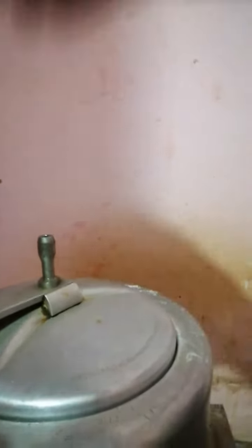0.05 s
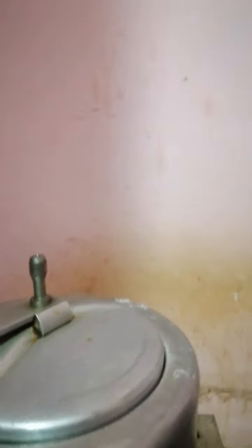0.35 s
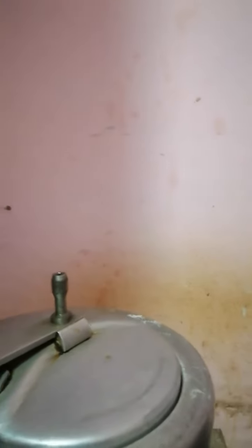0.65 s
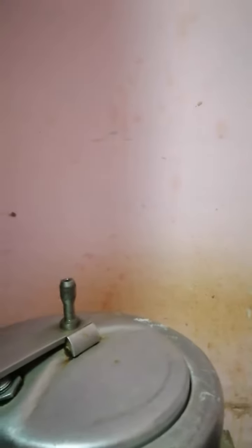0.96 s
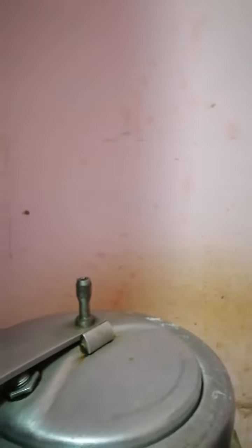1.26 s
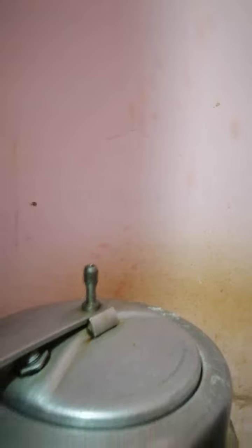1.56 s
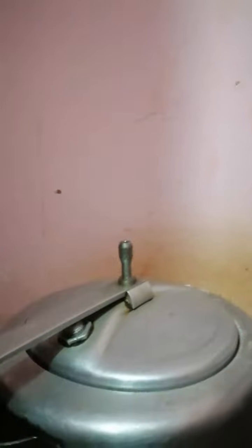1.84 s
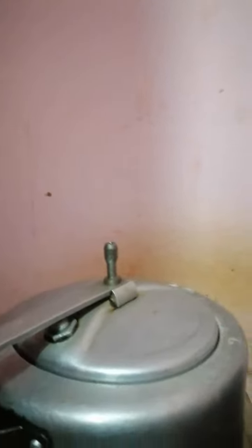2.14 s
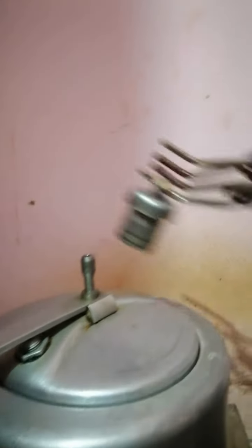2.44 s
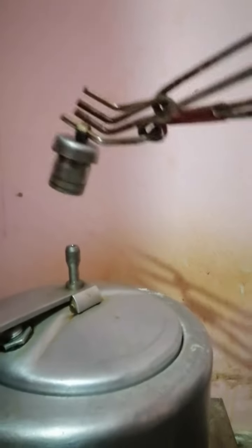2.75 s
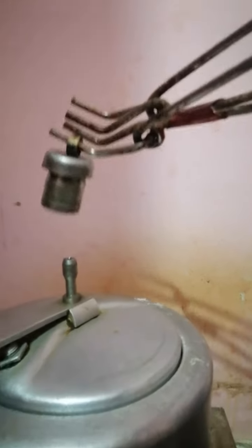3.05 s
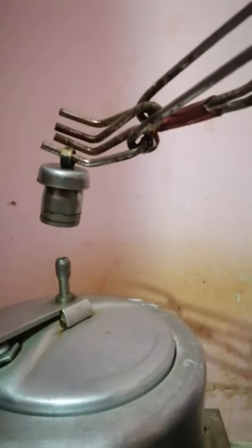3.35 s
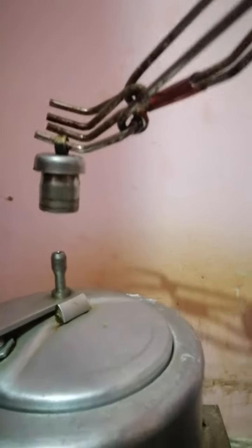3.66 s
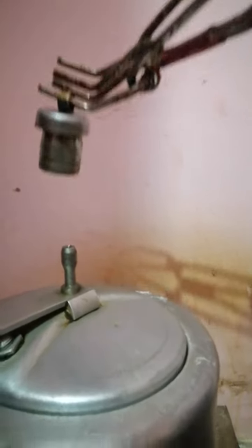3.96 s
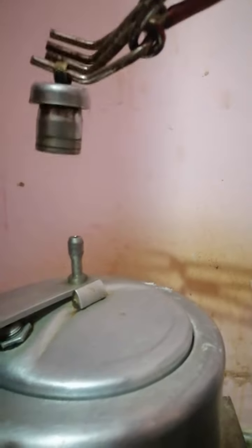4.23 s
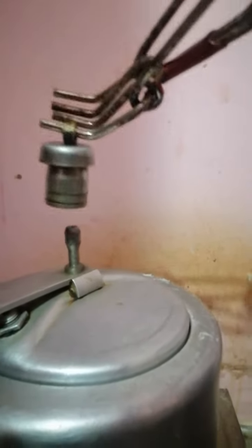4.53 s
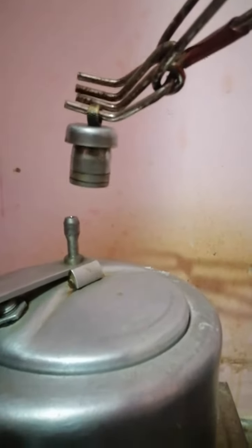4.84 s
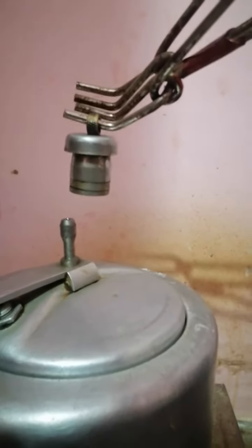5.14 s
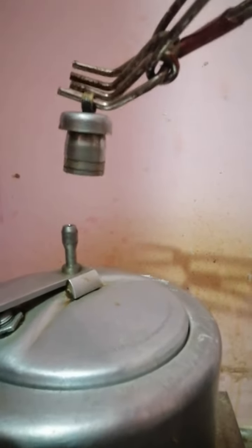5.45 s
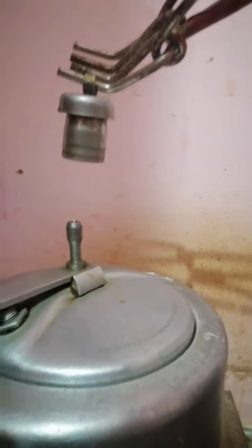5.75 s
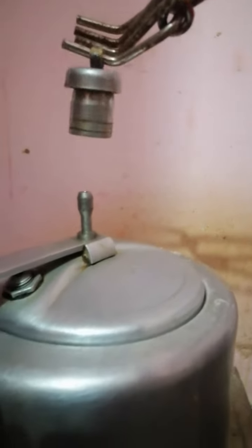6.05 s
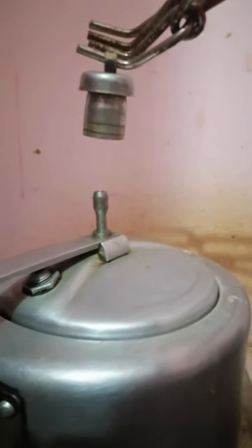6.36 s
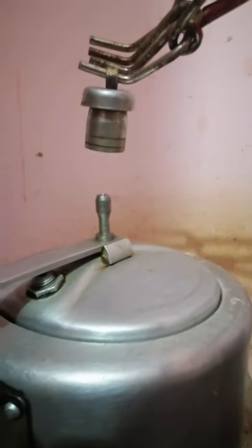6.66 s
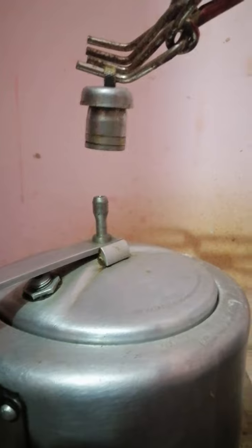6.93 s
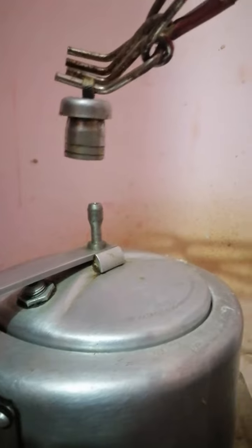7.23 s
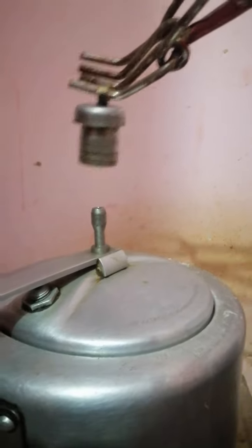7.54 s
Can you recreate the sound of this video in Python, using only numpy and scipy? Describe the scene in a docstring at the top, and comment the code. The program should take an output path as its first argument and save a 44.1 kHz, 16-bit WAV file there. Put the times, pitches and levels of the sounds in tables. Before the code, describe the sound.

A pressure cooker's even steam hiss breaks into uneven surges and thin whistles as a metal weight sways above the vent.

```python
"""An even, bright hiss: steam jets from the vent pipe of a pressure cooker, close by in a small kitchen.
A hand leaves the jet at the start with a low puff; drops of condensate tick at the pipe's lip.
From about 2.6 s the valve weight, held in tongs, sways in the steam. Grazing its rim, the jet hisses
sharply; striking it squarely, it rushes and roars, and the cavities under and inside the weight ring.
Thin whistles come and go at the edges, and the gas flame rumbles underneath."""
import sys
import numpy as np
from scipy import signal
from scipy.fft import rfft, irfft, next_fast_len
from scipy.io import wavfile
from scipy.ndimage import map_coordinates

SR = 44100
rng = np.random.default_rng(int(sys.argv[2]) if len(sys.argv) > 2 else 0)


def unload_audio(sound):
    """Save the sound as a 16-bit wav file, at the path given as the first command line argument."""
    columns = np.transpose(np.atleast_2d(sound))
    # keep every value between -1 and 1, then stretch to whole-number steps
    steps = np.round(np.clip(columns, -1, 1) * 32767)
    wavfile.write(sys.argv[1], SR, steps.astype(np.int16))


N = 334865


# Free jet: time_s, level_db
JET_LEVEL = [(0, -30.5), (0.11, -33), (0.16, -34), (2.5, -35), (2.68, -35.5), (2.95, -40), (3.15, -36),
             (3.55, -32.5), (3.75, -34), (3.92, -41), (4.5, -36.5), (4.68, -33.5), (4.88, -34), (5.02, -41),
             (5.27, -33), (5.8, -39), (6.6, -36), (7.25, -36), (7.59, -41.5)]
# Its spectrum: freq_hz, density_db
JET_COLOUR = [(60, -57), (300, -20), (780, -12), (1350, -8), (1600, -0.5), (2100, -5.5), (3000, -3),
              (4100, -2.5), (5600, 2), (6300, -3), (7700, 1.5), (8300, -1.5), (9500, 0.5), (10700, 0),
              (12000, -6.5), (15000, -12)]
# Its left-right balance: freq_hz, lean_db
JET_LEAN = [(800, -2), (1050, 1.5), (1600, -7), (2100, 2.5), (3400, -2.5), (4200, -2), (5800, -1.5),
            (9400, -2), (11000, 4.5), (14000, -0.5)]
def jet():
    """The turbulent free jet gives an even, bright hiss."""
    level_db, = curves(JET_LEVEL)
    hiss = turbulence(JET_COLOUR, flutter_db=0.5, eddy_db=0)
    hiss = unit(filtered(hiss, lambda hz: placed(1, along(JET_LEAN, hz))))
    return placed(amp(level_db) * hiss, lean_db=2.6 * during(CATCH, fade_s=0.039))


# Steam caught by the weight: time_s, level_db, aim_db (left positive)
CATCH = [(2.53, -55, -15), (2.61, -30.5, -2), (2.95, -34.5, -2), (3.42, -35, -2), (3.85, -34.5, 0),
         (4.2, -36.5, 0.5), (4.62, -32, 0), (5.05, -34, -1), (5.7, -34.5, 0), (6.3, -33.5, 0.5),
         (6.9, -37.5, -0.5), (7.35, -38, 2.5), (7.59, -32.5, 1.5)]
# Weight swings clear: start_s, end_s, loss_db
SLIPS = [(3.533, 3.727, 7.5), (4.244, 4.548, 13), (4.718, 4.819, 27), (4.958, 5.124, 3), (5.323, 5.47, 7)]
def caught_steam():
    """Level and aim of the steam meeting the weight; the level drops as the weight swings clear."""
    level_db, aim_db = curves(CATCH)
    loss_db = sum(db * gate(start, end, attack_s=0.02, release_s=0.024) for start, end, db in SLIPS)
    return level_db - loss_db, aim_db


# Square hits on weight or tongs: start_s, end_s, roar_db, hollow_db
STRIKES = [(2.66, 2.813, -51, -37.5), (2.844, 3.1, -47, -39.5), (3.098, 3.492, -39, -36.5),
           (3.822, 4.135, -47, -45), (4.124, 4.583, -41, -49), (4.598, 4.68, -46.5, -59),
           (4.835, 4.895, -45.5, -61.5), (5.194, 5.342, -48, -54.5), (5.463, 5.57, -43.5, -60),
           (5.727, 5.87, -42, -43), (5.985, 6.124, -39.5, -50), (6.275, 6.404, -43, -52),
           (6.596, 6.647, -41.5, -52)]
def strike_gains():
    """Each square hit drives the roar and the hollow ring."""
    return sum(np.outer(amp([roar_db, hollow_db]), gate(start, end, attack_s=0.016, release_s=0.02))
               for start, end, roar_db, hollow_db in STRIKES)


# Jet grazes the rim: start_s, end_s, hiss_db
GRAZES = [(2.614, 2.697, -26), (2.7, 2.891, -24.5), (2.924, 3.099, -26), (3.537, 3.649, -25),
          (3.705, 3.882, -26), (3.887, 4.12, -33), (4.726, 4.803, -28), (4.838, 4.914, -32),
          (5.19, 5.295, -33.5), (5.338, 5.431, -25.5), (5.581, 5.718, -33), (5.881, 5.977, -34),
          (6.16, 6.249, -27), (6.442, 6.575, -25), (6.661, 6.884, -25.5), (6.966, 7.135, -25),
          (7.181, 7.478, -26.5), (7.507, 7.623, -26)]
FULL_GRAZE_DB = -26.5
def graze_gain():
    """Each graze drives the rim hiss."""
    return sum(amp(db) * gate(start, end, attack_s=0.0267, release_s=0.03965)
               for start, end, db in GRAZES)


# Big-eddy spectrum: freq_hz, density_db
ROAR_COLOUR = [(60, -11), (160, -11), (260, -6), (480, 4.5), (900, 3.5), (1600, 1), (2400, 1), (4000, -24),
               (9000, -11.5)]
# Small-eddy spectrum: freq_hz, density_db
RUSH_COLOUR = [(60, -50), (250, -35), (600, -8), (1200, -0.5), (1700, 1.5), (4500, 1), (6000, 1), (7600, 3),
               (8700, 1), (9600, -0.5), (11000, -14), (14000, -25)]
FULL_STRIKE_DB, STRIKE_RUSH_DB, GRAZE_DUCK_DB, IDLE_ROAR_DB = -28.5, 14, 1, -20
def deflected_steam(caught_db, aim_db, strike, graze):
    """The jet breaks up on the weight: big eddies roar, small ones rush."""
    squareness = strike / amp(FULL_STRIKE_DB)
    thrown_db = aim_db - 3 * squareness  # strikes throw the steam to the right
    roar_gain = np.hypot(strike, amp(caught_db + IDLE_ROAR_DB))
    roar = roar_gain * turbulence(ROAR_COLOUR, flutter_db=-0.1, eddy_db=-0.5)
    rush_db = caught_db + 1.16 + STRIKE_RUSH_DB * squareness - GRAZE_DUCK_DB * graze / amp(FULL_GRAZE_DB)
    rush = amp(rush_db) * turbulence(RUSH_COLOUR, flutter_db=1.66, eddy_db=1.2)
    return placed(roar, lean_db=2.9 * thrown_db + 6.5) + placed(rush, lean_db=1.5 * thrown_db + 0.5)


# Rim hiss spectrum: freq_hz, density_db
RIM_COLOUR = [(60, -62), (300, -55), (800, -34), (2000, -21), (3500, -14.5), (4100, -8), (4700, 0),
              (5250, 0.5), (5750, -2), (6200, -6), (7200, -8), (8500, -17), (10500, -14), (14000, -31)]
IDLE_RIM_DB, RIM_PITCH_SPAN = -2, 0.015
def rim_hiss(caught_db, aim_db, graze):
    """The jet hisses sharply on the rim; the band follows the sway and rises with a harder graze."""
    gain = np.hypot(graze, amp(caught_db + IDLE_RIM_DB))
    hardness = np.minimum(graze / amp(FULL_GRAZE_DB), 1)
    pitch_ratio = gap_tuning() + RIM_PITCH_SPAN * (hardness - 0.5)
    hiss = shifted(turbulence(RIM_COLOUR, flutter_db=0.55, eddy_db=1.4), pitch_ratio)
    return placed(gain * hiss, lean_db=0.66 * aim_db - 1.4)


# Gap detuning by the swaying weight: time_s, shift_percent
SWAY = [(2.6, 0.42), (2.9, 1.32), (3.15, 0.07), (3.35, -3), (3.55, -0.86), (3.75, 0.96), (4.05, -3),
        (4.6, -2), (5.3, -0.5), (6.0, -0.56), (6.6, 0.97), (7.59, 2.5)]
def gap_tuning():
    """Pitch ratio of the gap as the weight sways."""
    shift_percent, = curves(SWAY)
    return 1 + shift_percent / 100


# Gap resonances: centre_hz, width_hz, gain_db
GAP_MODES = [(3380, 83, 5.5), (3540, 86, -3.5), (3900, 120, 3), (4610, 64, 4.5), (4870, 40, 6),
             (5200, 43, 2), (5540, 32, 4.5), (5690, 60, 4.5), (6940, 58, 3), (10360, 140, 1.5)]
def gap_resonance(x):
    """The gap between pipe and weight rings; its resonances glide with the sway."""
    hz, frame_s, spectra = signal.stft(x, SR, nperseg=2048)
    resting_hz = hz[:, None] / np.interp(frame_s * SR, np.arange(N), gap_tuning())
    gain = amp(sum(db * bell(resting_hz, centre, width) for centre, width, db in GAP_MODES))
    return signal.istft(spectra * gain, SR, nperseg=2048)[1][:, :N]


# Cavity inside the weight: time_s, level_db, pitch_hz
SINGING = [(2.6, -54, 2940), (2.9, -42, 2940), (3.35, -44, 2950), (3.6, -73, 2950), (4.15, -40, 2930),
           (4.4, -55.5, 3060), (4.65, -55, 2990), (5.5, -58, 2964), (6.05, -40, 3010), (7.1, -38.5, 3034),
           (7.59, -50, 3065)]
HOLLOW_HZ, SINGING_HZ, IDLE_HOLLOW_DB = 1617, 3067, -14.5
def cavities(caught_db, hollow_strike):
    """Steam blows across two cavities: the one under the weight rings hollow, the one inside sings."""
    hollow_gain = np.hypot(hollow_strike, amp(caught_db + IDLE_HOLLOW_DB))
    hollow = hollow_gain * resonant_noise(HOLLOW_HZ, width_hz=160)
    level_db, pitch_hz = curves(SINGING)
    song = shifted(resonant_noise(SINGING_HZ, width_hz=140), pitch_hz / SINGING_HZ)
    song *= amp(level_db) * during(SINGING, fade_s=0.03)
    return placed(hollow, lean_db=-4) + placed(song, lean_db=-0.5)


# Edge tones: start_s, end_s, first_hz, last_hz, width_hz, level_db, lean_db
WHISTLES = [(.47, .61, 3220, 3350, 180, -54, -7), (.726, .86, 3340, 3250, 197, -51, -7),
            (.9, 1.01, 3680, 3760, 240, -50.5, -9), (1.12, 1.322, 3650, 3520, 241, -51, -8),
            (1.596, 1.763, 3140, 3150, 400, -45.5, -4), (3.12, 3.47, 5220, 5230, 127, -45, -12),
            (3.72, 4.117, 4820, 4780, 149, -50, -7), (4.603, 4.677, 3880, 4160, 1099, -33.5, 0),
            (4.74, 4.922, 4800, 4860, 173, -40, 1), (5.17, 5.696, 4840, 4800, 182.2, -39.5, 1),
            (5.74, 6.452, 4034, 4140, 190.3, -46.5, -5), (5.88, 5.979, 4960, 4810, 157.7, -41, -1),
            (6.7, 7.588, 5034, 4957, 160.2, -38, 5.5), (6.687, 6.869, 5730, 5650, 221, -34, 0),
            (7.2, 7.591, 5635, 5670, 198, -40, -6)]
def edge_whistles():
    """Vortices shed at an edge: narrow noise bands that glide and flutter; wider ones waver more."""
    out = np.zeros((2, N))
    waver, flutter_db = 0.2 * wobble(22), 1.8 * wobble(28)
    for start, end, first_hz, last_hz, width_hz, level_db, lean_db in WHISTLES:
        n = np.arange(int((start - 0.1) * SR), min(N, int((end + 0.1) * SR)))
        pitch_hz = np.interp(n / SR, [start, end], [first_hz, last_hz]) + width_hz * waver[n]
        phase = 2 * np.pi * np.cumsum(pitch_hz) / SR
        # random quadrature amplitudes spread the tone into a band
        position = (n - n[0]) * width_hz / SR
        i, q = (map_coordinates(knots, [position]) for knots in rng.standard_normal((2, 1024)))
        tone = unit(amp(flutter_db[n]) * (i * np.cos(phase) + q * np.sin(phase)))
        envelope = amp(level_db) * gate(start, end, attack_s=0.035, release_s=0.035)[n]
        out[:, n] += placed(envelope * tone, lean_db)
    return out


# Condensate drops: start_s, peak_db, pitch_hz
SPITS = [(1.6274, -22, 9300), (2.7584, -14, 5500), (2.8664, -25, 5500), (3.0214, -26, 5500),
         (3.0494, -21, 5500), (3.7145, -18, 5570), (6.0077, -28, 6000), (6.249, -20.5, 6040),
         (7.3721, -41, 5984)]
SPIT_T60_S, SPIT_WIDTH_HZ = 0.0082, 1800
def spits():
    """Each drop bursts at the pipe's lip in a short, bright tick."""
    t = np.arange(SR // 50) / SR
    hz = np.fft.rfftfreq(len(t), 1 / SR)
    ticks = np.zeros(N + SR)
    for start_s, peak_db, pitch_hz in SPITS:
        spectrum = rfft(rng.standard_normal(len(t))) * bell(hz, pitch_hz, SPIT_WIDTH_HZ)
        tick = irfft(spectrum, len(t)) * amp(-60 * t / SPIT_T60_S)
        ticks[round(start_s * SR):][:len(t)] += amp(peak_db) * tick / np.abs(tick).max()
    return ticks[:N]


# Spectrum of steam on the hand: freq_hz, density_db
HAND_COLOUR = [(60, -24), (180, 2), (350, 0), (620, 0.5), (780, 5), (1000, -29), (1700, -3), (4000, -9),
               (9000, -25)]
HAND_DB, HAND_LEAVES_S, HAND_FADE_S = -42, 0.13, 0.02
def hand():
    """The cupped hand gives a low, hollow puff until it leaves the jet."""
    in_jet = (1 - np.tanh((np.arange(N) / SR - HAND_LEAVES_S) / HAND_FADE_S)) / 2
    return amp(HAND_DB) * in_jet * turbulence(HAND_COLOUR, flutter_db=-0.3, eddy_db=1.5)


# Gas flame: time_s, level_db (before trim)
FLAME_LEVEL = [(0, -53), (0.3, -53), (1.5, -54), (1.75, -50.5), (2.45, -52), (2.62, -49), (2.76, -58),
               (3.3, -54), (3.88, -64), (4.05, -56.5), (4.48, -51), (4.75, -64), (5.0, -55.5), (5.4, -59),
               (5.7, -54), (6.2, -61), (6.75, -60.5), (7.59, -63.5)]
# Its spectrum: freq_hz, density_db
FLAME_COLOUR = [(15, -54), (25, -24), (35, -19), (48, -11.5), (96, -5), (144, 1.5), (168, -8), (199, -3.5),
                (260, -14), (400, -38), (520, -56), (880, -120)]
# Low room modes: centre_hz, width_hz, gain_db
ROOM_MODES = [(63.8, 14.4, 15.5), (90, 7.4, 6.5), (105, 4, 12.5)]
FLAME_TRIM_DB, FLAME_FLICKER_DB = -1.96, 1.0
def burner():
    """The flickering gas flame rumbles in the low modes of the room."""
    level_db, = curves(FLAME_LEVEL)
    gain = amp(level_db + FLAME_TRIM_DB + FLAME_FLICKER_DB * wobble(7.7))
    modes_db = lambda hz: sum(db * bell(hz, centre, width) for centre, width, db in ROOM_MODES)
    rumble = diffuse(lambda hz: along(FLAME_COLOUR, hz) + modes_db(hz))
    return placed(gain * rumble, lean_db=-5.5)


ECHO_RANGE_MS, ECHO_MS_PER_PERCENT, ECHO_CORNER_HZ = (3, 30), 0.023, 1800
def echo_comb(x, echo_db, count=10):
    """Echoes off lid, pot and wall comb the treble, differently per side; the comb slides with sway."""
    n = np.arange(N)
    sway_percent, = curves(SWAY)
    echoes = np.zeros((2, N))
    for side in (0, 1):
        for place, slope, sign in rng.uniform(-1, 1, size=(count, 3)):
            delay_ms = np.interp(place, [-1, 1], ECHO_RANGE_MS)
            delay_ms += ECHO_MS_PER_PERCENT * slope * sway_percent
            echoes[side] += np.sign(sign) * np.interp(n - delay_ms * SR / 1000, n, x[side])
    echo_share = lambda hz: hz ** 2 / (hz ** 2 + ECHO_CORNER_HZ ** 2) / (1 + amp(-echo_db) ** 2)
    direct = filtered(x, lambda hz: np.sqrt(1 - echo_share(hz)))
    return direct + filtered(echoes, lambda hz: np.sqrt(echo_share(hz) / count))


# Peaks and notches between lid, pipe and wall: centre_hz, width_hz, left_db, right_db
STANDING_WAVES = [(413, 91, -1, 0), (536, 36, -5, -8), (553, 110, 1.5, 0.5), (617, 29, 3.5, 4.5),
                  (756, 34, -0.5, 9), (1410, 69, -15, 4.5), (1450, 22, 6, -3.7), (1630, 107, -4.5, 4.5),
                  (1950, 92, 0.5, 7), (2320, 79, -15, -2.5), (2456, 180, 4, 6), (2950, 50, 0.5, 4),
                  (2894, 65, -0.5, -4.5), (3230, 830, 1, 2), (3250, 57, -8, 0.5), (3550, 130, 2.5, 4.5),
                  (4076, 126, 6.8, -6), (4370, 210, 4, 3), (4740, 200, 2.5, -1), (5800, 310, -3, -2),
                  (6290, 320, -2, -6), (7440, 240, -0.5, -3), (8220, 530, -4.5, -5.5),
                  (9450, 190, -4.5, 3.5), (11500, 440, 3.5, -1), (12300, 910, -2, -2),
                  (14178, 1563, -15, -6)]
def standing_waves(x):
    """Each microphone sits at a different point in the standing waves."""
    return filtered(x, lambda hz: amp(sum(np.outer([left_db, right_db], bell(hz, centre, width))
                                          for centre, width, left_db, right_db in STANDING_WAVES)))


# Left-right likeness in the kitchen: freq_hz, coherence
KITCHEN_COHERENCE = [(100, 0.94), (500, 0.61), (1500, 0.91), (4500, 0.54), (9000, 0.18), (15000, 0.19)]
def diffuse(colour_db):
    """Coloured stereo noise of rms 1: direct sound common to both sides, echoes unlike."""
    angle = lambda hz: np.arccos(np.clip(along(KITCHEN_COHERENCE, hz), 0, 1)) / 2
    response = lambda hz: amp(colour_db(hz)) * [np.cos(angle(hz)), np.sin(angle(hz))]
    mid, side = filtered(rng.standard_normal((2, N)), response)
    return unit(np.array([mid + side, mid - side]))


def turbulence(colour, flutter_db, eddy_db):
    """Flow noise of rms 1: the stream flutters, and single eddies burst within milliseconds."""
    noise = diffuse(lambda hz: along(colour, hz))
    return unit(noise * amp(flutter_db * wobble(25) + eddy_db * wobble(700)))


def resonant_noise(centre_hz, width_hz):
    """Stereo noise with one resonant peak."""
    return diffuse(lambda hz: -20 * np.log10(1 + ((hz - centre_hz) / width_hz) ** 2))


def spaced(x, lead_ms, bend):
    """The nearer, left microphone hears the steam first; reflections bend the phase."""
    half_phase = lambda hz: np.pi * hz * lead_ms / 1000 + along(bend, hz) / 2
    return filtered(x, lambda hz: np.exp(np.outer([1j, -1j], half_phase(hz))))


def placed(x, lean_db):
    """Stereo, with left above right by lean_db."""
    return x * amp(np.outer([1, -1], lean_db) / 2)


def shifted(x, ratio):
    """Stereo noise resampled by a changing pitch ratio, rms 1."""
    return unit(np.array([map_coordinates(side, [np.cumsum(ratio)], mode="mirror") for side in x]))


def filtered(x, response):
    """x through a frequency response."""
    size = next_fast_len(N + SR // 2)
    return irfft(rfft(x, size) * response(np.fft.rfftfreq(size, 1 / SR)), size)[..., :N]


def bell(hz, centre_hz, width_hz):
    """Gaussian peak of height 1."""
    return np.exp(-((hz - centre_hz) / width_hz) ** 2)


def along(points, hz):
    """A freq_hz, value table read on a log axis."""
    freq_hz, values = np.transpose(points)
    return np.interp(np.log(hz + 1), np.log(freq_hz + 1), values)


def curves(rows):
    """One value per sample for each column after time_s."""
    time_s, *columns = np.transpose(rows)
    return [np.interp(np.arange(N) / SR, time_s, column) for column in columns]


def during(rows, fade_s):
    """1 while a table lasts, fading to 0 outside it."""
    start, end = rows[0][0], rows[-1][0]
    return np.interp(np.arange(N) / SR, [start - fade_s, start, end, end + fade_s], [0, 1, 1, 0])


def gate(start_s, end_s, attack_s, release_s):
    """A window with soft edges."""
    t = np.arange(N) / SR
    return (1 + np.tanh((t - start_s) / attack_s)) * (1 - np.tanh((t - end_s) / release_s)) / 4


def wobble(rate_hz):
    """A smooth random curve, rate_hz knots a second."""
    knots = rng.standard_normal(int(N * rate_hz / SR) + 4)
    return map_coordinates(knots, [np.arange(N) * rate_hz / SR])


def amp(db):
    """Decibels to gain."""
    return 10 ** (np.asarray(db) / 20)


def unit(x):
    """Scaled to rms 1."""
    return x / np.sqrt(np.mean(x ** 2) + 1e-20)


# Phase bend by reflections, free jet: freq_hz, left_lead_rad
JET_BEND = [(100, 1), (1500, -1.47), (2200, -0.28), (3800, -0.96), (6000, 0.59)]
# Phase bend by reflections, at the weight: freq_hz, left_lead_rad
WEIGHT_BEND = [(100, -2.1), (1000, -0.23), (1300, -0.9), (1700, -1.34), (2400, -0.58), (2900, -0.92),
               (3700, -2.04), (4200, 0.2), (5000, 1), (5400, 0.2), (7200, 3), (11000, -0.2)]
def scene():
    """The free jet, the steam at the weight, the whistles and the flame."""
    free = spaced(jet() + hand() + spits(), lead_ms=0.3, bend=JET_BEND)
    caught_db, aim_db = caught_steam()
    strike, hollow_strike = strike_gains()
    graze = graze_gain()
    steam = deflected_steam(caught_db, aim_db, strike, graze) + rim_hiss(caught_db, aim_db, graze)
    steam = echo_comb(gap_resonance(steam), echo_db=-4.5)
    at_weight = standing_waves(steam + cavities(caught_db, hollow_strike))
    return free + spaced(at_weight, lead_ms=0.3125, bend=WEIGHT_BEND) + edge_whistles() + burner()


TOP_HZ = 15150
def record(dry):
    """Brick-wall low-pass."""
    return filtered(dry, lambda hz: hz < TOP_HZ)


dry = scene()
out = record(dry)
unload_audio(out)
```